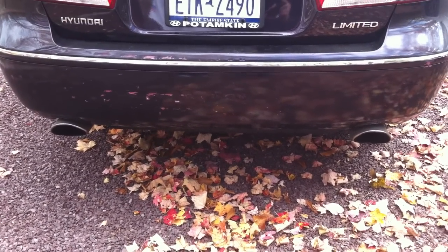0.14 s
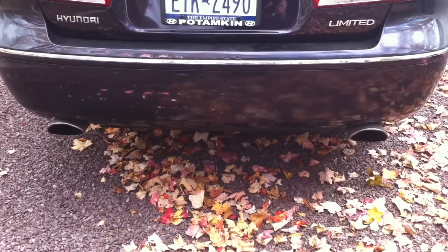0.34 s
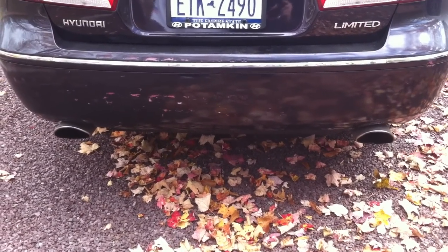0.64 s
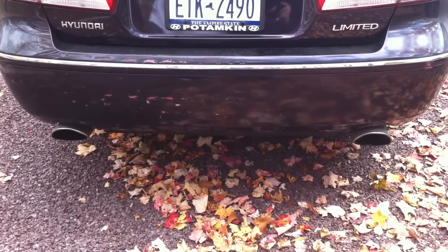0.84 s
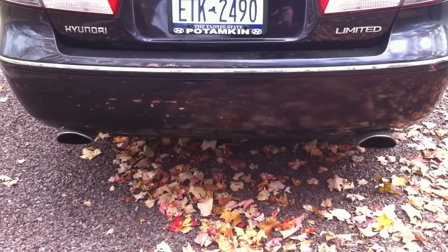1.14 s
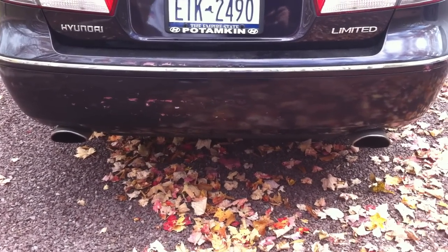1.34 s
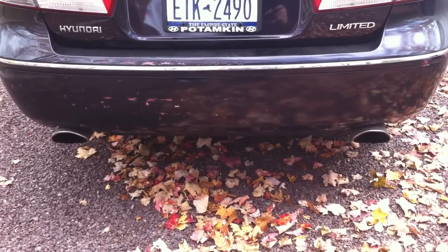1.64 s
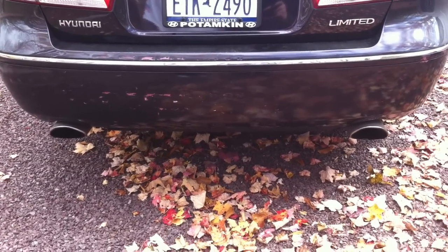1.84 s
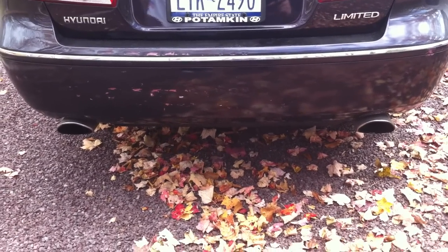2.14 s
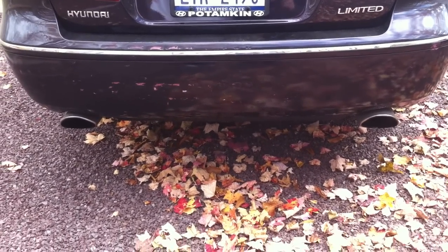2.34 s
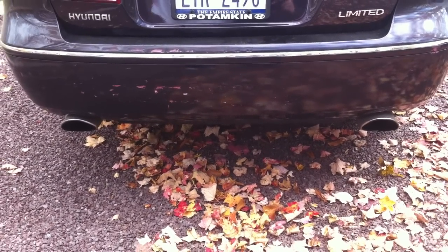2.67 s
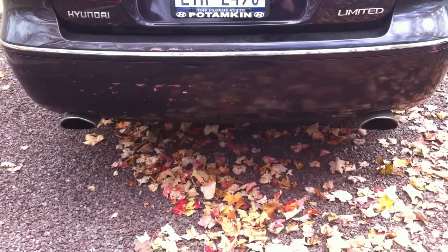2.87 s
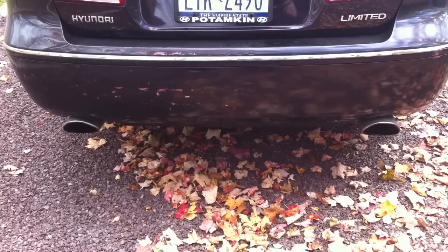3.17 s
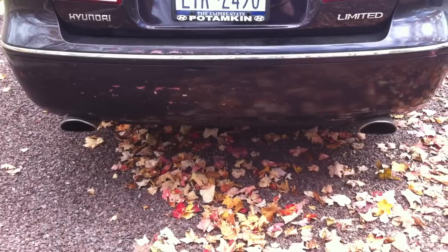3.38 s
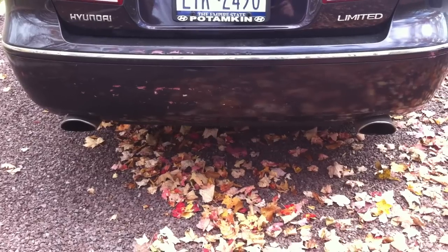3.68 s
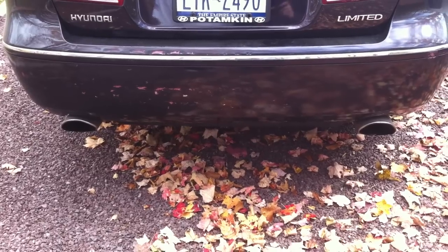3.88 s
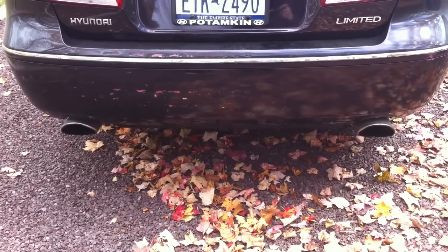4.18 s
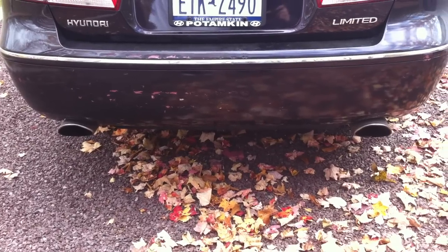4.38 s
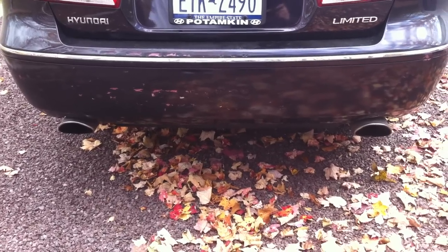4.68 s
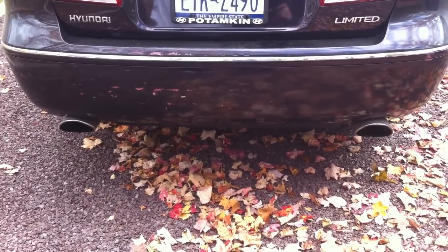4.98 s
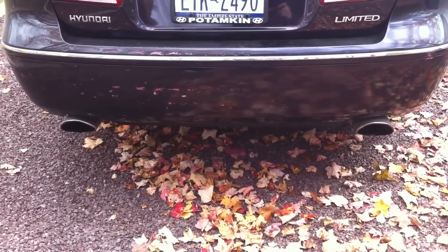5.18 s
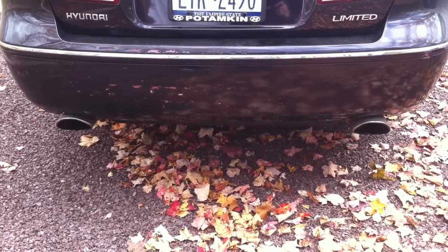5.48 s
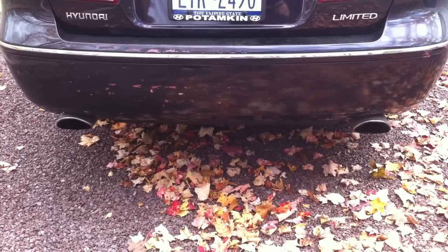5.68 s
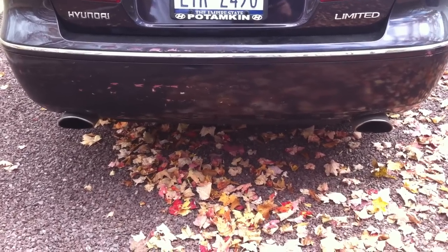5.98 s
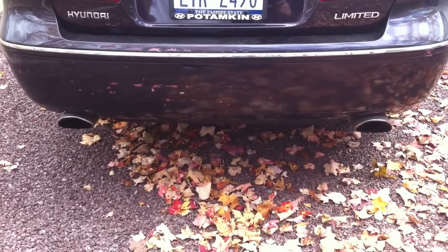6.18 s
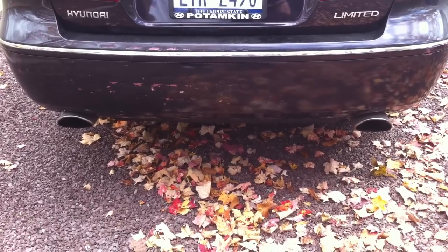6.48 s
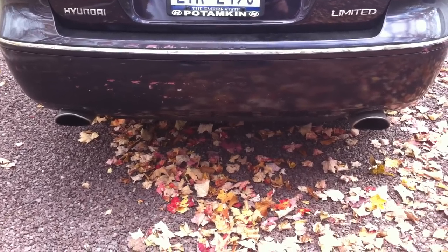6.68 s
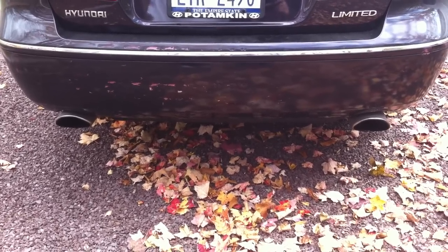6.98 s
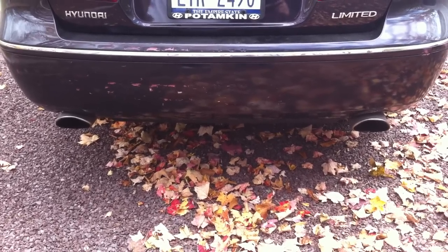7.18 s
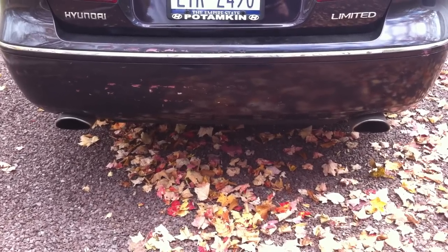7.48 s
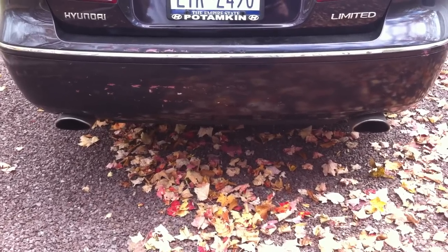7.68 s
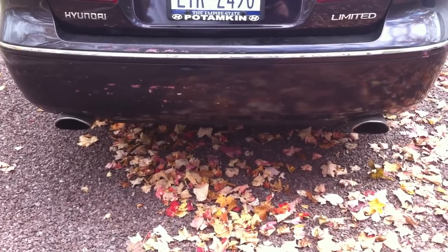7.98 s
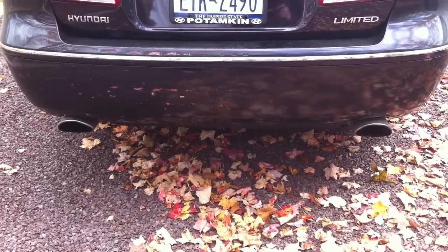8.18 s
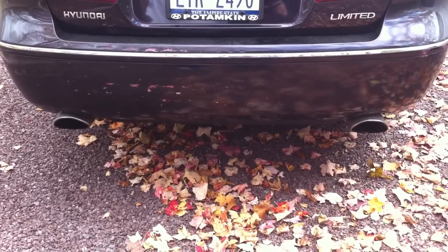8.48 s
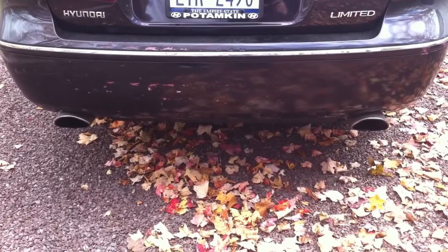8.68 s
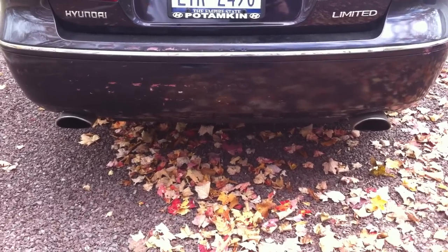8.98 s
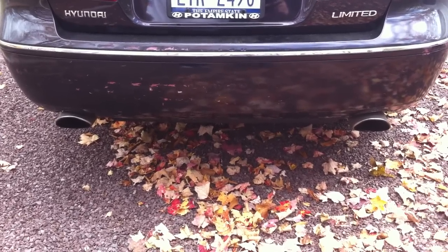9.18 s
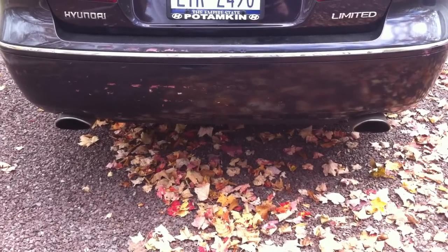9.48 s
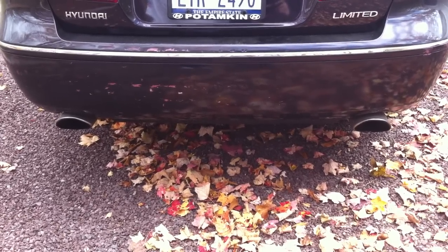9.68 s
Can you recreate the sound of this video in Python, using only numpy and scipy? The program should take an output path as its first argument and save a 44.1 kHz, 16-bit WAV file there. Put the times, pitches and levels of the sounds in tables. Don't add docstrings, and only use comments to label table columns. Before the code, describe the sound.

A six-cylinder car idles fast outdoors, its low exhaust boom humming steadily before the pitch creeps up, then sinks back quieter and muffled.

```python
import sys
import numpy as np
from scipy import signal
from scipy.fft import rfft, irfft
from scipy.io import wavfile
from scipy.ndimage import uniform_filter1d, map_coordinates

SR = 44100
rng = np.random.default_rng(int(sys.argv[2]) if len(sys.argv) > 2 else 0)


def wrap_up_sound(samples):
    columns = np.atleast_2d(samples).T
    tamed = np.clip(columns, -1, 1)
    steps = np.round(tamed * 32767).astype(np.int16)
    wavfile.write(sys.argv[1], SR, steps)


def voltage_ratio(level):
    return 10 ** (np.asarray(level, float) / 20)


N = 433492

IDLE_HZ, RISING_HZ = 68, 70
IDLE_THIRD_DB = -16
TILT = -1.2


def evened(x):
    return x / np.sqrt(np.mean(x ** 2) + 1e-20)


def coloured(points):
    f, db = np.transpose(points)
    hz = np.fft.rfftfreq(N, 1 / SR)
    gain = voltage_ratio(np.interp(np.log(hz + 1), np.log(f + 1), db, left=-90))
    return evened(irfft(rfft(rng.standard_normal(N)) * gain, N))


def smoothed(hz):
    return uniform_filter1d(hz, size=1300)


def beyond(hz):
    soft_hz = 20
    return soft_hz * np.logaddexp(0, hz / soft_hz)


def per_firing(firings, every=1):
    values = rng.standard_normal(1000)
    return map_coordinates(values, [firings / every + 5], order=1 + 2 * (every == 1))


def controls():
    # start_s, speed_firings_per_s, pulse_level_db, pulse_sharpness_db
    engine_course = [(0.0, 67.76, -17.1, -42.6), (1.1, 68.02, -16.3, -41.6), (2.6, 67.72, -15.9, -43.5),
                     (4.1, 67.48, -16.1, -45.1), (5.1, 68.27, -15.1, -44.1), (5.6, 67.35, -16.0, -46.8),
                     (6.25, 67.97, -15.7, -45.3), (6.45, 69.41, -14.4, -42.0), (6.87, 70.38, -15.6, -41.7),
                     (7.33, 69.53, -17.1, -47.5), (7.52, 71.41, -18.2, -43.8), (7.75, 71.51, -19.0, -45.4),
                     (8.0, 71.59, -19.5, -46.2), (8.3, 71.93, -20.8, -49.4), (8.65, 71.83, -22.0, -52.2),
                     (9.1, 70.82, -21.9, -56.7), (9.5, 68.61, -23.0, -57.8), (9.83, 67.64, -24.4, -61.4)]
    # start_s, speed_change_firings_per_s
    burn_events = [(0.13, 0.84), (0.45, 0.69), (0.88, -0.59), (1.0, 0.55), (1.28, -0.49), (1.57, -0.9),
                   (1.86, -0.46), (2.21, 0.5), (2.28, -1.21), (2.38, 0.95), (2.6, 0.46), (2.84, 0.76),
                   (2.96, -0.41), (3.07, 1.02), (3.51, 0.41), (3.6, -0.76), (3.71, 0.74), (3.9, 0.6),
                   (4.06, 0.5), (4.43, -1.08), (4.7, -0.85), (4.8, 0.68), (5.16, 0.42), (5.44, 0.93),
                   (6.05, -1.06), (6.17, -0.53), (6.91, -0.41), (7.15, 0.51)]
    burn_effects_db = [
        0.83,
        1.4,
        1.0,
        2.9,
        .5,
    ]
    rise_s, settle_s = .03, .06
    idle_sharp_db = -43

    t = np.arange(N) / SR
    s, *curves = np.transpose(engine_course)
    hz, third_db, sharp_db = [np.interp(t, s, c) for c in curves]

    burns = .1 * per_firing(t * IDLE_HZ, every=3.0)
    for start, change in burn_events:
        after = np.maximum(t - start, 0)
        burns = burns + 4 * change * (np.exp(-after / settle_s) - np.exp(-after / rise_s))

    level, load_db, extra = third_db - IDLE_THIRD_DB, sharp_db - idle_sharp_db, hz - IDLE_HZ

    def law(idle_db, level_share, load_share, db_per_firing):
        return idle_db + level_share * level + load_share * load_db + db_per_firing * extra

    second_db = law(-17.5, 0.54, 0.18, -0.07) + 0.14 * extra * level
    fourth_db = law(-23.5, .65, 0.42, 0.23) + 0.28 * extra ** 2
    flow_db = law(-51.5, 0.16, 0.24, -0.34)

    slow = [second_db, third_db, fourth_db, load_db, flow_db]
    columns = [hz + burns] + [db + per_hz * burns for db, per_hz in zip(slow, burn_effects_db)]
    firings = np.cumsum(columns[0]) / SR - .75
    return firings, columns


def exhaust(firings, hz, second_db, third_db, fourth_db, load_db):
    # multiple_of_half_firing_rate, level_db
    idle_orders = [(1, -55), (2, -24), (3, -13), (4, -1), (5, -17), (6, 0), (7, -21), (8, -8), (9, -24),
                   (10, -25), (11, -34), (12, -38), (13, -41), (14, -33), (15, -38), (16, -36), (17, -38),
                   (18, -34), (19, -52), (20, -47), (21, -44), (22, -46), (23, -49), (24, -53), (25, -51),
                   (26, -52), (27, -51), (28, -53), (29, -52), (30, -55)]
    # multiple_of_half_firing_rate, level_db
    rising_orders = [(1, -58), (2, -22), (3, -15), (4, -2), (5, -18), (6, 0), (7, -24), (8, -7), (9, -34),
                     (10, -30), (11, -36), (12, -40), (13, -45), (14, -30), (15, -40), (16, -33), (17, -40),
                     (18, -42), (19, -54), (20, -45), (21, -47), (22, -45), (23, -50), (24, -54), (25, -54),
                     (26, -49), (27, -55), (28, -56), (29, -58), (30, -59)]
    # multiple_of_half_firing_rate, level_db
    fast_orders = [(1, -54), (2, -20), (3, -14), (4, -3), (5, -17), (6, 0), (7, -23), (8, -4), (9, -35),
                   (10, -28), (11, -43), (12, -44), (13, -38), (14, -33), (15, -38), (16, -31), (17, -45),
                   (18, -45), (19, -47), (20, -48), (21, -40), (22, -49), (23, -50), (24, -52), (25, -50),
                   (26, -55), (27, -53), (28, -51), (29, -57), (30, -57)]
    fast_hz = 71.7
    muffler_hz, lag_s = 190, .003
    early_hz, lead_s = 600, .0035
    bank_lead = 1.1

    shift = .002 * per_firing(firings)
    strength_db = .12 * per_firing(firings)
    edge_db = .7 * per_firing(firings)
    speed = smoothed(hz)
    climb = np.clip(speed - IDLE_HZ, 0, 2.5)

    boom_db = third_db + 0.44 * (load_db - third_db + IDLE_THIRD_DB)
    body_db = third_db + 0.6 + .5 * np.minimum(load_db + 3.5, 0)
    upper_db = load_db + .4 * np.minimum(load_db + 7.0, 0) + edge_db - 15.5
    main_orders = {4: second_db, 6: third_db, 8: fourth_db}

    out = np.zeros(len(hz))
    orders = zip(idle_orders[1:], rising_orders[1:], fast_orders[1:])
    for (k, idle_db), (_, rising_db), (_, top_db) in orders:
        f, upper = k * hz / 2, k > 11
        rising_db = rising_db + 0.27 * upper
        top_db = top_db - 0.84 * upper + 1.5 * (k in (16, 21))
        db = np.interp(speed, [IDLE_HZ, RISING_HZ, fast_hz], [idle_db, rising_db, top_db])
        if upper:
            db = db + upper_db
        else:
            db = db + (boom_db if k < 9 else body_db)

        lag = 2 * np.pi * (lag_s * beyond(muffler_hz - f) + lead_s * beyond(f - early_hz))
        banks = (bank_lead + .8 * (k > 9)) * (k % 2) - .4 * upper
        banks = banks + .3 * (k % 2 or k > 9) * (k > 6) * climb
        scatter = .12 * upper * per_firing(firings, every=4.5)
        phase = np.pi * k * (firings + shift) + lag + TILT + banks + scatter
        out += voltage_ratio(main_orders.get(k, db)) * np.cos(phase)
    return np.sqrt(2) * voltage_ratio(strength_db) * out


def mismatch(firings, hz, load_db):
    # multiple_of_six_firing_cycle, idle_level_db, db_per_extra_firing_per_s
    cylinder_lines = [(8, -64, 0), (10, -51, 0), (11, -41, -1.5), (13, -48, -1.5), (14, -52, -.5),
                      (16, -46, -1), (17, -41, 1.2), (19, -39, -1), (20, -55, 1.2), (22, -52, -.5),
                      (23, -48, 1.6), (25, -43, -.3), (26, -47, -1.4), (28, -64, 2), (29, -57, 2.5),
                      (31, -58, -3), (32, -57, -1.7), (35, -70, 2), (43, -57, -2.5), (44, -63, -1.5),
                      (46, -69, 3.5), (47, -63, -2), (50, -62, -3), (52, -67, .7), (53, -58, -1),
                      (55, -63, -3), (56, -66, -4), (59, -67, -2)]
    out, extra = np.zeros(len(firings)), smoothed(hz) - IDLE_HZ
    for k, db, per_hz in cylinder_lines:
        waver = 1 + .3 * (per_firing(firings, every=7.5) + 1j * per_firing(firings, every=7.5))
        db = db + per_hz * extra + .4 * (k > 27) * np.minimum(load_db, 0) - 0.1
        spread = .1 * max(k - 27, 0) ** 2 + 2.3 * (12 - k) * (k < 15)
        phase = 2 * np.pi * k * firings / 6 + TILT + spread
        out += voltage_ratio(db) * (waver * np.exp(1j * phase)).real
    return out * voltage_ratio(.05 * load_db)


def gas(firings, load_db, flow_db):
    # pitch_hz, level_db_per_hz
    hiss_spectrum = [(700, -3.5), (1480, -11), (2100, -7.5), (2600, -6.5), (3100, -6), (3350, -15.5),
                     (4050, -23), (4600, -19), (5500, -14.5), (6800, -24.5), (9000, -24), (10400, -17.5),
                     (12200, -24), (15700, -31.5)]
    hiss = coloured(hiss_spectrum)

    def cut(x, hz, kind):
        return signal.sosfiltfilt(signal.butter(3, hz, kind, fs=SR, output="sos"), x)

    low, high = cut(hiss, 1400, "low"), cut(hiss, 3200, "high")
    middle, top = hiss - low - high, cut(hiss, 7500, "high")
    high = high + top * (voltage_ratio(0.068 * load_db) - 1)
    high = high * voltage_ratio(2.0 * np.exp(-firings / 130.0))
    roar = low * voltage_ratio(0.45 * load_db + .6 * np.minimum(load_db + 4.5, 0))

    every_db = 1.0 * np.cos(2 * np.pi * (firings + 0.047))
    every_db = every_db + 1.6 * per_firing(firings) + .5 * per_firing(firings, every=8.3)
    nearer = np.exp(-((firings + 0.078) % 2) / 0.37)
    nearer_db = 6.3 * uniform_filter1d(nearer, 200) + 1.2 * np.cos(2 * np.pi * (firings + 0.02))
    nearer_db = nearer_db + 0.97 * per_firing(firings)

    puffs = (roar + middle) * voltage_ratio(every_db) + high * voltage_ratio(nearer_db - 0.5 + .02 * load_db)
    return voltage_ratio(flow_db) * evened(puffs)


def whine(firings, load_db):
    # pitch_hz at idle speed, level_db
    belt_tones = [(1254, -74.5), (2595, -73.5)]
    tones = sum(voltage_ratio(db + 9) * np.cos(2 * np.pi * f / IDLE_HZ * firings) for f, db in belt_tones)
    return tones * voltage_ratio(0.52 * load_db)


def street(load_db):
    # pitch_hz, level_db_per_hz
    street_spectrum = [(20, -4), (50, -4.5), (90, -1.5), (300, 2.5), (600, -0.5), (1000, -11), (2500, -15),
                       (5000, -23.5), (15000, -36)]
    noise = coloured(street_spectrum)
    band = signal.butter(2, [330, 950], "band", fs=SR, output="sos")
    middle = signal.sosfiltfilt(band, noise)
    return voltage_ratio(-48.5) * ((noise - middle) * voltage_ratio(0.27 * load_db) + middle * voltage_ratio(0.75 * load_db))


def knocks():
    # start_s, peak_level_db
    knock_events = [
        (.818, -31),
    ]
    out, t = np.zeros(N), np.arange(2500) / SR
    band = signal.butter(1, [600, 1500], "band", fs=SR, output="sos")
    for s, db in knock_events:
        ticks = .04 * rng.standard_normal(len(t)) * np.exp(-t / .02)
        ticks[[100, 230, 420]] += [1, -.7, .5]
        burst = signal.sosfilt(band, uniform_filter1d(ticks, size=9))
        out[round(s * SR) - 200:][:len(t)] += voltage_ratio(db) * burst / abs(burst).max()
    return out


def fast_whine(firings, hz):
    # pitch_hz at idle speed, level_db
    fast_tones = [(952, -76), (1752, -74.5), (2176, -70.5)]
    rise_db = 5.4 * (np.minimum(hz, RISING_HZ) - RISING_HZ)
    out = np.zeros(len(firings))
    for f, db in fast_tones:
        waver_db = 3 * per_firing(firings, every=4.5)
        out += voltage_ratio(db + rise_db + waver_db) * np.cos(2 * np.pi * f / IDLE_HZ * firings)
    return out


def scene():
    firings, columns = controls()
    hz, *_, load_db, flow_db = columns

    step = 6
    slow_firings = firings[::step]
    slow_hz, *slow_orders_db, slow_load_db, _ = [c[::step] for c in columns]
    boom = exhaust(slow_firings, slow_hz, *slow_orders_db, slow_load_db)
    boom = boom + mismatch(slow_firings, slow_hz, slow_load_db)
    boom = signal.resample_poly(boom, step, 1, window=("kaiser", 12), padtype="edge")[:N]

    belts = whine(firings, load_db) + fast_whine(firings, hz)
    mix = boom + gas(firings, load_db, flow_db) + belts + knocks() + street(load_db)
    return mix[None]


def roll_off(x):
    return signal.sosfilt(signal.butter(12, 15790, fs=SR, output="sos"), x)


def record(dry):
    whistle = voltage_ratio(-90) * np.cos(2 * np.pi * 14998 * np.arange(N) / SR)
    return roll_off(dry + whistle)


dry = scene()
out = record(dry)
wrap_up_sound(out)
```